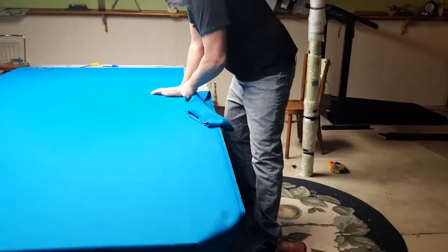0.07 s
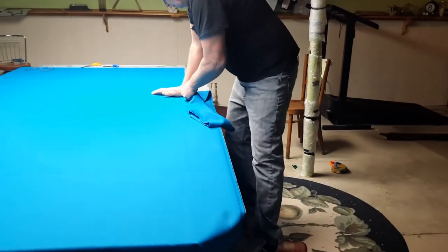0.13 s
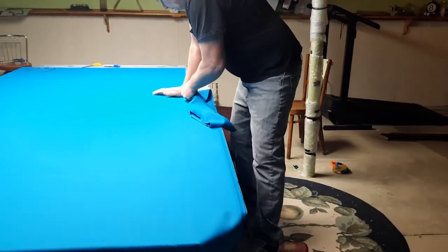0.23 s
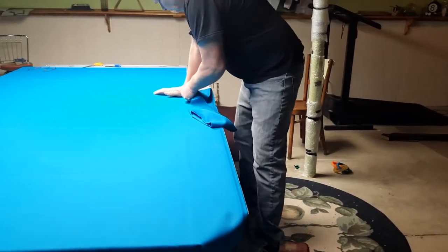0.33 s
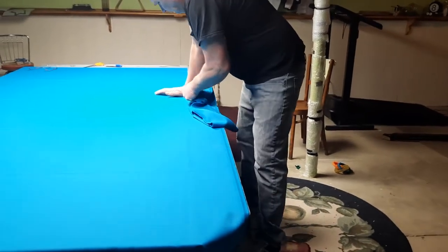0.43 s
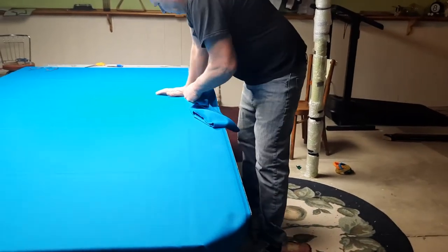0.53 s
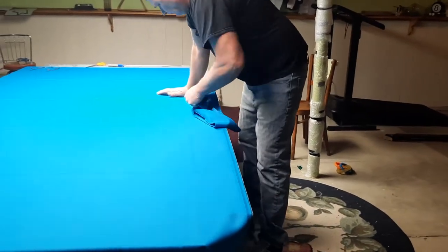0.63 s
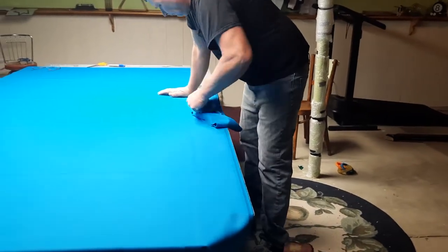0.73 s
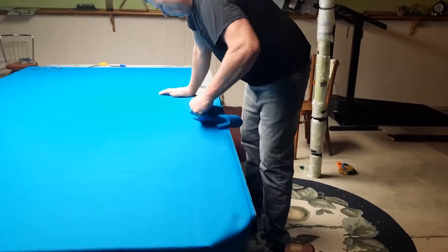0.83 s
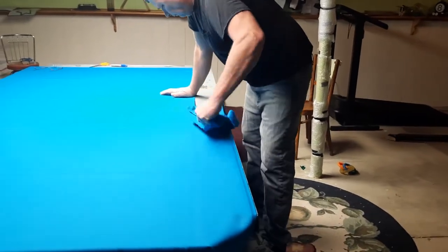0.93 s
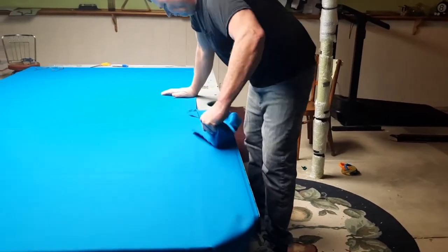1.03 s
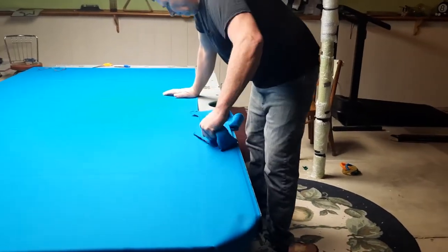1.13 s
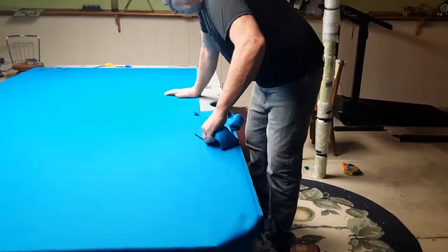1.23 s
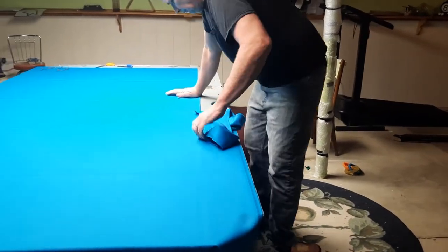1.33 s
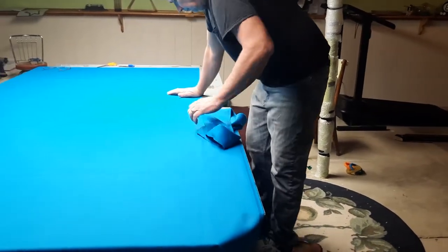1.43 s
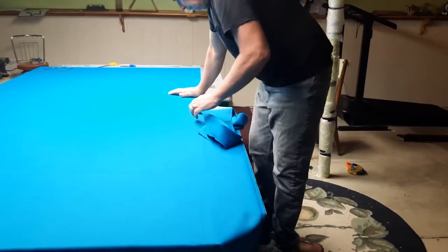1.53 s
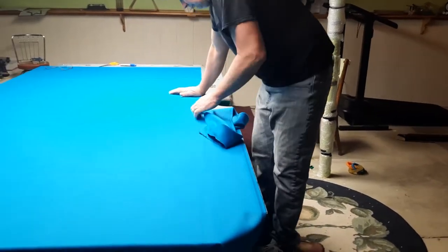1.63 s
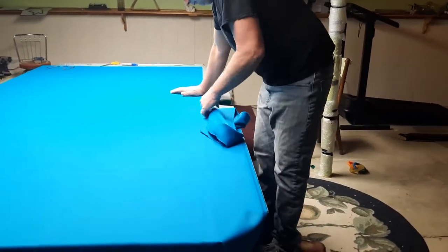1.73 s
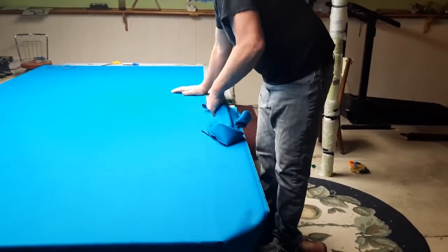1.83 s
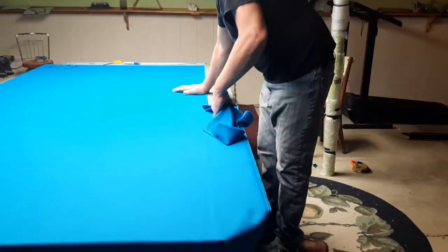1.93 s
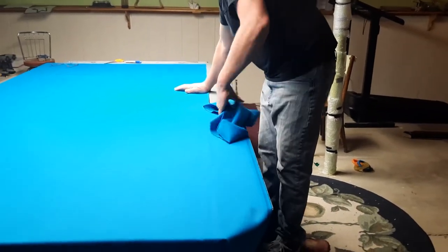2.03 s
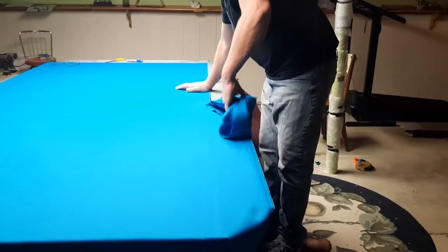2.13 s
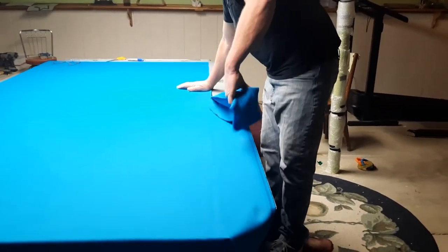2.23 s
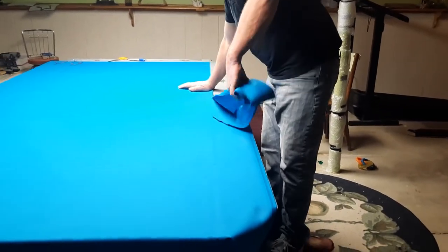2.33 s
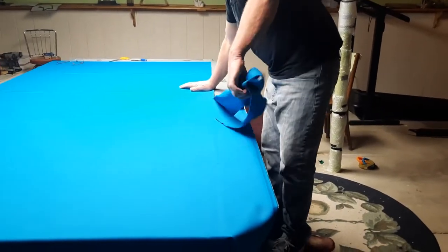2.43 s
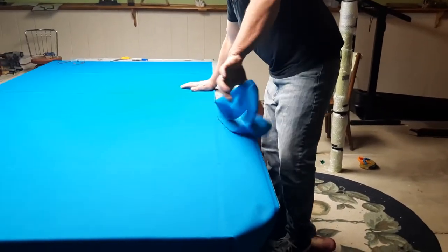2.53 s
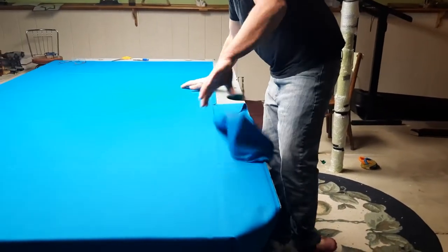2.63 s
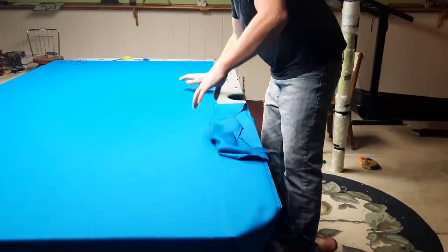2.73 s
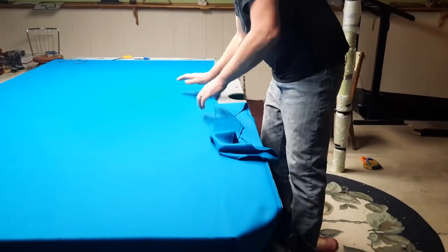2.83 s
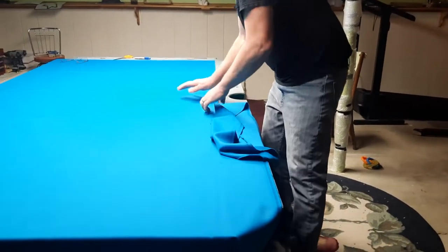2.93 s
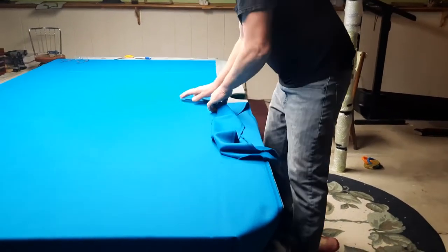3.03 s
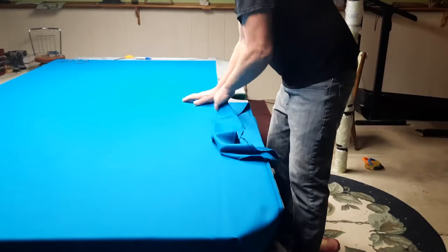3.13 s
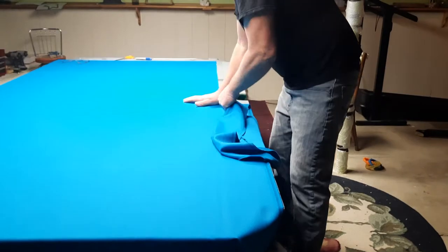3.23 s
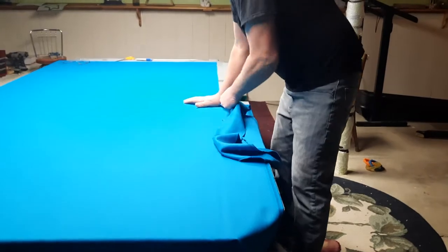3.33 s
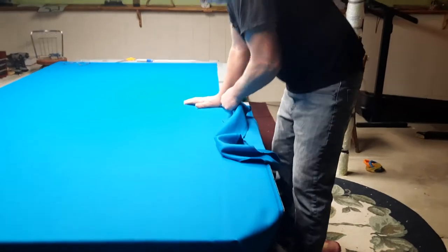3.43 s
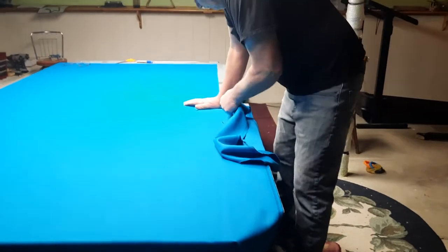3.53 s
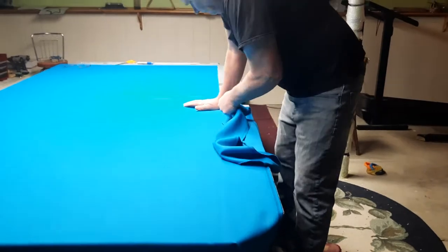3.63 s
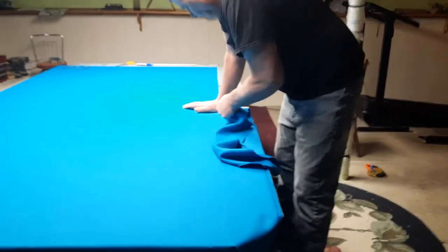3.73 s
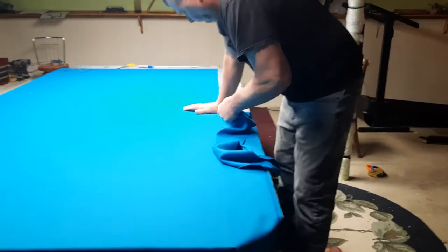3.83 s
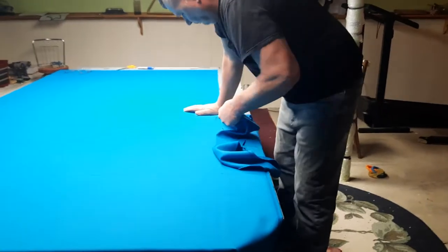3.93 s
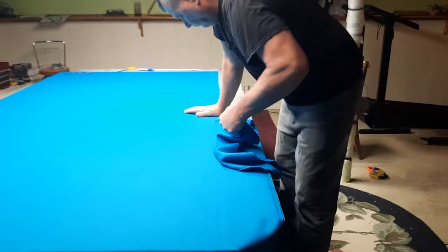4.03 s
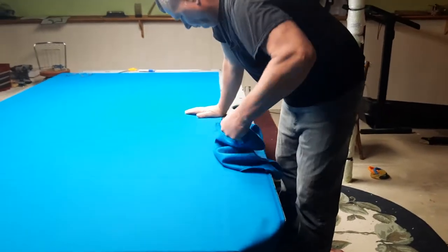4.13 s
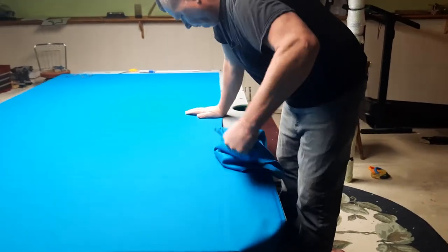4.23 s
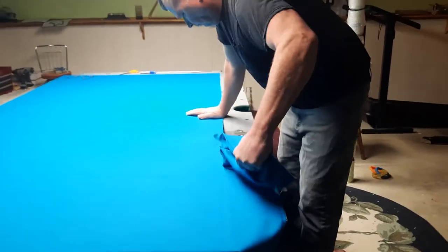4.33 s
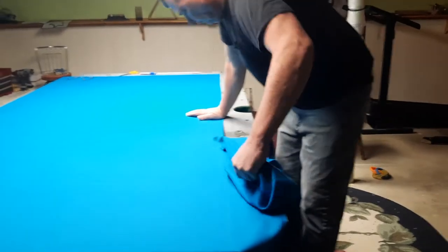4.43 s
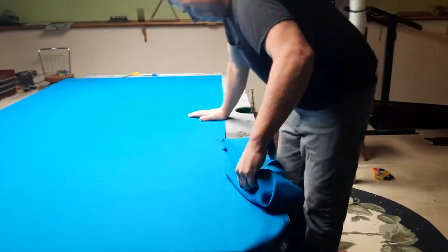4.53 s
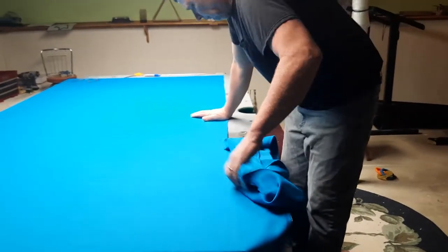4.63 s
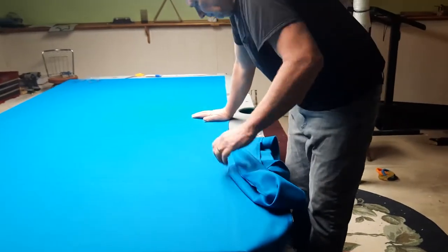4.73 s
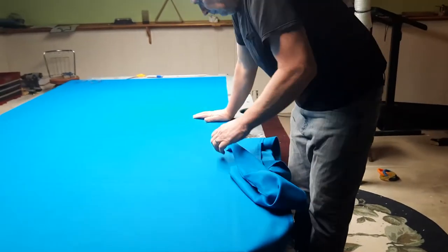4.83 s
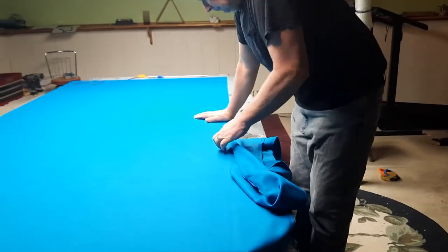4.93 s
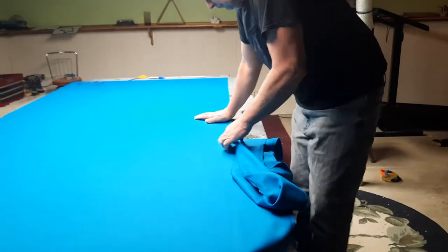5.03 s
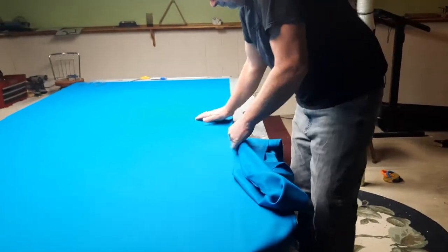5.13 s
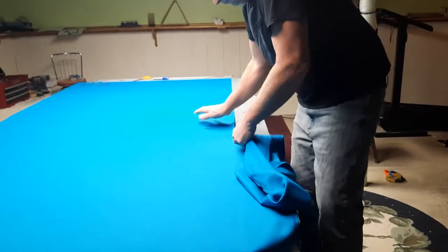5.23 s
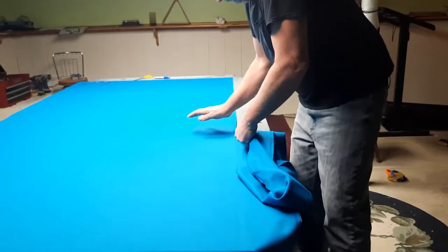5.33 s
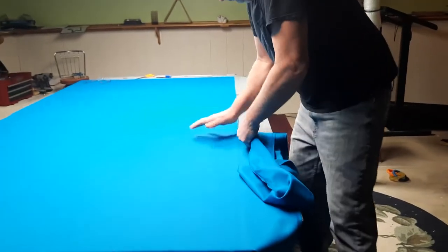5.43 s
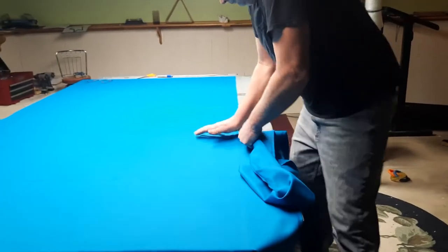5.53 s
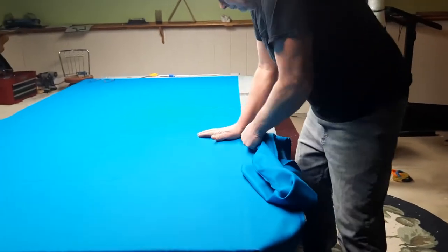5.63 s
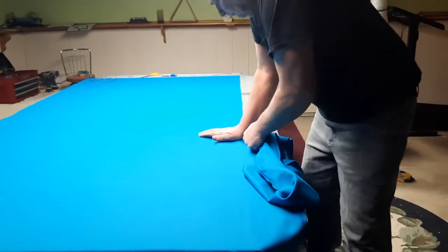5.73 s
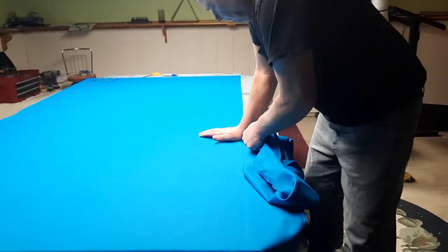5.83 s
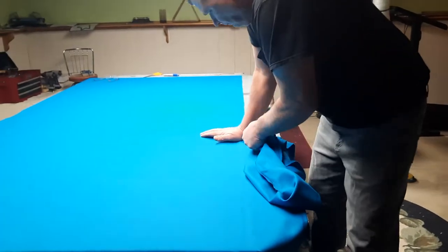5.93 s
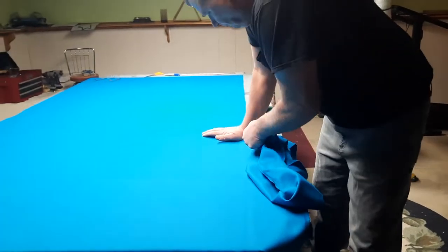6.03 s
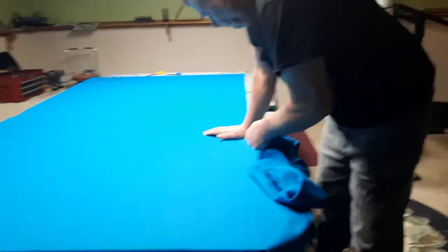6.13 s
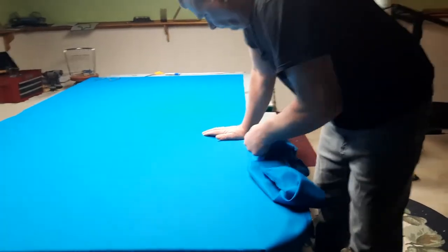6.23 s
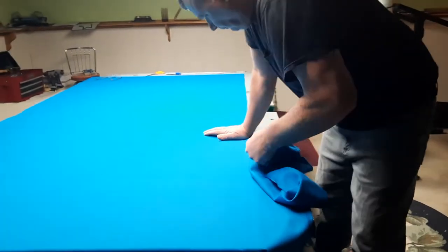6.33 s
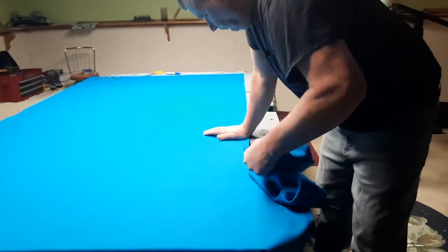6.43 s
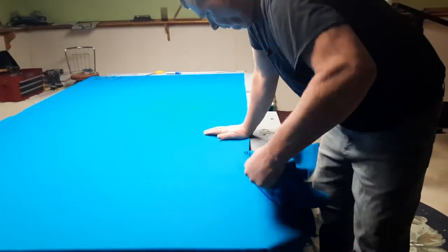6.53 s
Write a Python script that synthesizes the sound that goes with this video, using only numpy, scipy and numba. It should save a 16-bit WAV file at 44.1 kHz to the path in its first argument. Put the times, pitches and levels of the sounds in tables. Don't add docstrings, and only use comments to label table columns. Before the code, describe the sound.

Soft air, low house hum and faint cloth rustle in a basement room. At 0.3 s a loud, harsh rip bursts out: glue spots and threads snap in uneven, dense crackles until about 1.1 s, starting bright and falling to a deeper flapping tone, with table boom and fizzing fibres. A short room tail fades into calm. Rustling rises gently around 2.2-2.8 s, with dull pats near 2.6 and 3.0 s. Close finger ticks and knocks hop between sides from 3.1 s, ending in a strong thud and scrape at 3.7 s as a softer, steadier rip runs to 4.4 s. Very quiet until a sharp palm slap with a heavy follow-up at 5.6 s. Small ticks at 5.95 s, then a third rip starts crackling at 6.0 s, grows stronger with low bumps beneath, and is still tearing at the end, about 6.6 s.

```python
import sys
import numpy as np
from scipy import signal
from scipy.fft import rfft, irfft
from scipy.io import wavfile
from scipy.ndimage import uniform_filter1d
from numba import njit

SR = 44100
rng = np.random.default_rng(int(sys.argv[2]) if len(sys.argv) > 2 else 0)


def wrap_up_sound(samples):
    columns = np.atleast_2d(samples).T
    tamed = np.clip(columns, -1, 1)
    steps = np.round(tamed * 32767).astype(np.int16)
    wavfile.write(sys.argv[1], SR, steps)


def boost_factor(decibels):
    exponent = np.asarray(decibels, float) / 20
    return 10 ** exponent


N = 290178
T = np.arange(N) / SR

# time in seconds, level in dB.
PULL_CURVES = [
    [(0.303, -22), (0.335, -20), (0.351, -15), (0.415, -18), (0.6, -23), (0.759, -19), (0.96, -19),
     (1.04, -21), (1.09, -29)],
    [(3.686, -32.5), (3.752, -23), (3.79, -24.5), (3.9, -26), (3.972, -22.5), (4.138, -24), (4.266, -21.5),
     (4.342, -23), (4.37, -35)],
    [(6.025, -32), (6.08, -26.5), (6.18, -23.5), (6.307, -24.5), (6.421, -22.5), (6.521, -21.5),
     (6.555, -19.5), (6.58, -19)],
]
# start in seconds, peak in dB.
STRONG_SNAPS = [(0.303, -10), (0.325, -6.5), (0.355, -4), (0.373, -10.5), (0.388, -7), (0.4, -1),
                (0.425, -5.5), (0.436, -12), (0.484, -7), (0.515, -12), (0.573, -6.5), (0.74, -3.5),
                (0.819, -28), (3.689, -21), (3.721, -17.5), (3.782, -28), (4.068, -24), (6.03, -20.5),
                (6.047, -27), (6.061, -16.5), (6.074, -19.5), (6.091, -29), (6.1, -25), (6.11, -16),
                (6.152, -16.5), (6.184, -31)]
# boom in dB, fizz in dB, fizz held back at first in dB,
# swell in seconds, left minus right in dB.
TABLE_AND_FIBRES = [(-18.5, -21.5, -11.5, 0.17, 1), (-24, -26, -8.5, 0.14, -0.05),
                    (-19.5, -19.5, -21, 0.13, -1.4)]


def tearing():
    luck = rng.random((3, N))
    sizes = np.minimum(rng.exponential(size=(3, N)), 2.2) - 1
    signs = np.sign(rng.random((3, N)) - 0.5)
    snaps, rest, pan_db = np.zeros((3, N))
    for pull, swell in zip(PULL_CURVES, TABLE_AND_FIBRES):
        boom_db, fizz_db, late_db, swell_s, pull_pan_db = swell
        s, level_db = np.transpose(pull)
        on = (T > s[0]) & (T < s[-1])
        speed = np.clip((T - s[0]) / 0.25, 0, 1)
        snaps_per_s = (250 + 700 * speed) * boost_factor(3.0 * walk(25))

        def snapping(kind, more, spread_db):
            chance = more * snaps_per_s / SR
            return on * signs[kind] * (luck[kind] < chance) * boost_factor(spread_db * sizes[kind]) / np.sqrt(chance)

        effort_db = np.interp(T, s, level_db)
        early = np.exp(-np.maximum(T - s[0], 0) / swell_s)
        glue = snapping(0, 0.97, 3.59)
        boom = 0.5 * band(glue + snapping(1, 1.5, 2.8), 165, 600)
        boom *= boost_factor(boom_db - 21 * early)
        fizz = band(0.23 * glue + snapping(2, 8.0, 1.7), 4500, 20000)
        fizz *= boost_factor(fizz_db + late_db * early) * np.clip((s[-1] + 0.043 - T) / 0.078, 0, 1)
        snaps += boost_factor(effort_db - 8.5) * glue * (0.43 + 0.77 * speed)
        let_go = np.clip((s[-1] + 0.009 - T) / 0.03, 0, 1)
        rest += boost_factor(0.42 * (effort_db + 23)) * let_go * (T > s[0]) * (boom + fizz)
        pan_db += on * pull_pan_db
    for s, db in STRONG_SNAPS:
        add(snaps, s + 0.001222, boost_factor(db + 7.5) * np.ones(1))
    return cloth(snaps) + rest, uniform_filter1d(pan_db, 2000)


# flap from Hz, flap to Hz, line from Hz, line to Hz, line level in dB.
FLAP_AND_LINE = [(2310, 450, 2330, 2200, 0), (1100, 890, 2500, 2800, 3), (1100, 920, 5500, 2300, 4.5)]


def cloth(snaps):
    latest = np.searchsorted([pull[0][0] - 0.02 for pull in PULL_CURVES[1:]], T)
    start, end = np.transpose([(pull[0][0], pull[-1][0]) for pull in PULL_CURVES])[:, latest]
    torn = np.clip((T - start) / (end - start), 0, 1)
    from_hz, to_hz, line_from_hz, line_to_hz, line_db = np.transpose(FLAP_AND_LINE)[:, latest]
    flap_hz = to_hz + (from_hz - to_hz) * (1 - torn) ** 2.77
    line_hz = line_from_hz + (line_to_hz - line_from_hz) * torn
    flap = svf(snaps, flap_hz, np.full(N, 0.69))[1]
    flap = flap + boost_factor(-20) * svf(snaps, flap_hz, np.full(N, 0.2))[0]
    line = svf(snaps, line_hz, np.full(N, 0.13))[0]
    line = boost_factor(line_db - 5.5 * (2 - torn) - 15.5) * line
    bright = np.clip(torn / 0.3, 0, 1)
    return (1 - bright) * band(flap, 270, 3700) + bright * band(flap, 300, 4900) + line


@njit
def svf(x, hz, width):
    mid, high, b, l = np.empty(len(x)), np.empty(len(x)), 0., 0.
    for i in range(len(x)):
        g = np.tan(np.pi * hz[i] / SR)
        v = (b + g * (x[i] - l)) / (1 + g * (g + width[i]))
        mid[i] = v
        high[i] = x[i] - width[i] * v - l - g * v
        b, l = 2 * v - b, l + 2 * g * v
    return mid, high


# start in seconds, level in dB, length in seconds, top in Hz.
PALM_SLAPS = [
    (2.625, -46.5, 0.055, 295),
    (2.969, -48.5, 0.047, 298),
    (5.564, -59.5, 0.051, 600),
    (5.618, -32.5, 0.019, 2750),
    (5.636, -31.5, 0.033, 430),
    (5.656, -41.5, 0.05, 2700),
]


def slaps():
    out = np.zeros(N)
    t = np.arange(SR // 5) / SR
    for s, db, length_s, top_hz in PALM_SLAPS:
        burst = rng.standard_normal((2, len(t))) * np.exp(-(t / length_s) ** 2)
        skin = band(burst[0], 346, max(top_hz, 550), order=4)
        skin = skin + band(burst[0], 0.92 * top_hz, top_hz)
        thump_db = 11.0 if top_hz < 1000 else 6.0
        thump = boost_factor(thump_db) * band(burst[1], 42, min(top_hz, 500))
        add(out, s, boost_factor(db) * (skin + thump))
    return out


# start in seconds, peak in dB, ring in Hz, T60 in seconds,
# left minus right in dB.
CASE_KNOCKS = [(3.133, -19, 303, 0.049, -25), (3.302, -31, 148, 0.077, -7), (3.607, -15, 247, 0.018, 18),
               (3.643, -25.5, 325, 0.081, 24), (3.708, -10, 235, 0.041, 20), (5.632, -35, 131, 0.059, 3),
               (6.22, -39, 90, .1, 16), (6.36, -35, 90, 0.072, 17)]
# start in seconds, peak in dB, T60 in seconds, left minus right in dB,
# top in Hz.
CASE_TICKS = [(3.09, -62, 0.33, -19, 12000), (3.132, -42, 0.031, -29, 4940), (3.19, -51, .01, -11, 7000),
              (3.204, -51, 0.0086, -7, 7000), (3.262, -51, .02, -18, 9000),
              (3.279, -30.5, 0.0067, -27, 7560), (3.297, -18.5, 0.01, -19, 4200),
              (3.301, -28, 0.01, -25, 6000), (3.443, -41, 0.041, -18, 5800),
              (3.456, -28, 0.0067, -16, 3900), (3.489, -49, 0.036, -27, 5960),
              (3.606, -30.5, 0.18, -9, 4900), (3.642, -30.5, 0.074, 28, 3000),
              (3.674, -24, 0.0027, 19, 8000), (3.701, -18, 0.07, 13, 4000), (5.948, -31.5, 0.02, 5, 4850),
              (5.96, -50, 0.29, 1, 12000)]
# level in dB, T60 in seconds, from Hz, to Hz.
SKIN_SQUEAK = (-42, 0.06, 3950, 4550)
# start in seconds,
# level in dB, T60 in seconds, low edge in Hz, left minus right in dB.
SCRAPES_AND_FIZZ = [(3.636, -41, 0.06, 3200, 20), (3.687, -11, 0.034, 2350, -1), (3.702, -3, 0.026, 2290, 7.5),
                    (3.1, -61, .2, 11000, -17), (3.583, -52, .02, 7300, -7), (6.028, -41, 0.55, 11000, 8),
                    (5.619, -33, .16, 2560, 2.5), (5.59, -59, 0.42, 4450, -15), (5.62, -61, 0.22, 8100, 9),
                    (5.687, -58.5, 0.32, 9000, 9), (5.621, -37, 0.075, 4600, -12.5),
                    (5.685, -50, 0.39, 4800, -9)]


def fingers():
    out = np.zeros((2, N))
    t = np.arange(SR // 8) / SR
    sides = np.array([[0.5], [-0.5]])
    for s, db, hz, t60, pan_db in CASE_KNOCKS:
        ring = -np.sin(2 * np.pi * hz * t / (1 + 35 * t))
        ring = ring + 3.4 * band(rng.standard_normal(len(t)), 66, 500)
        sway = boost_factor(4.0 - 60 * t / 0.19) * band(rng.standard_normal((2, len(t))), 42, 95)
        fade = boost_factor(-50 * t / t60) * np.clip(t / 0.0016, 0, 1)
        add(out, s, boost_factor(db + 2.0 + sides * pan_db - abs(pan_db) / 2) * (ring * fade + sway))
    for s, db, t60, pan_db, top_hz in CASE_TICKS:
        grit = rng.standard_normal((2, len(t))) * boost_factor(-60 * t / t60)
        tick = band(grit, 480, top_hz) + 0.21 * band(grit, 11000, 16000)
        add(out, s, boost_factor(db - 7.0 + sides * pan_db) * tick)
    db, t60, from_hz, to_hz = SKIN_SQUEAK
    slip_hz = to_hz + (from_hz - to_hz) * np.exp(-t / 0.037)
    slip = svf(rng.standard_normal(len(t)), slip_hz, np.full(len(t), 0.06))[0]
    add(out, 3.64, boost_factor(db - 60 * t / t60 + sides * 19) * np.clip(t / 0.006, 0, 1) * unit(slip))
    for s, db, t60, low_hz, pan_db in SCRAPES_AND_FIZZ:
        grit = rng.standard_normal((2, len(t))) * boost_factor(-60 * t / t60) * np.clip(t / 0.0022, 0, 1)
        high_hz = low_hz * (1 + low_hz / 12400)
        add(out, s, boost_factor(db + 1.0 + sides * pan_db) * band(grit, low_hz, high_hz))
    return out


# time in seconds, level in dB.
CALM_LEVEL = [(0, -59.5), (.29, -59), (1.4, -66), (1.61, -67), (1.9, -66), (2.24, -58), (2.64, -55),
              (2.81, -58.5), (2.98, -62), (3.24, -59.5), (3.58, -60.5), (4.65, -70.5), (4.9, -71.5),
              (5.04, -67), (5.24, -66.5), (5.4, -70), (5.9, -71), (6.02, -65)]
# house hum in dB, crisp edge in dB.
GRIP_CALM = [(-49.5, -72.5), (-57.5, -64.5), (-50.5, -76)]
REGRIPS_S = [3.64, 5.9]


def calm():
    air_db = np.interp(T, *np.transpose(CALM_LEVEL))
    lift_db = air_db + 60
    hum_db, crisp_db = np.transpose(GRIP_CALM)[:, np.searchsorted(REGRIPS_S, T)]
    ducked, pulling = np.zeros((2, N))
    for pull in PULL_CURVES:
        start, end = pull[0][0], pull[-1][0]
        ducked += (T > start) * np.clip(1 - (T - end) / 2.6, 0, 1)
        pulling += (T > start) * (T < end)
    hum_sway_db = 0.41 * lift_db - 7.5 * ducked
    edge_db = crisp_db + 2.1 * lift_db + 3.0
    crisp_db = crisp_db + 2.4 * lift_db
    rumble = boost_factor(hum_db + hum_sway_db + 0.81 * walk(36) + 11.5) * pair(220, 403.5)
    air = boost_factor(air_db + 0.43 * walk(12) + 0.5) * pair(430, 3200)
    edge = boost_factor(edge_db - crisp_db) * (pair(4200, 4800) + 1.1 * pair(5500, 6400))
    crisp = boost_factor(crisp_db + walk(27) + 6.5) * (pair(5000, 20000) + edge)
    shake_db = 8 * uniform_filter1d(pulling, size=4000)
    deep = band(rng.standard_normal((2, N)), 36, 190, order=3) + 2.0 * pair(70, 200)
    deep = boost_factor(0.62 * hum_sway_db - 49.5 + shake_db + walk(2.3)) * deep
    return rumble + air + crisp, deep


def pair(low_hz, high_hz, size=N):
    mid, side = rng.standard_normal((2, size))
    side = signal.sosfilt(signal.butter(2, 700, "highpass", fs=SR, output="sos"), side)
    return band(np.array([mid + side, mid - side]), low_hz, high_hz)


SCATTER_HZ = 3000
# frequency in Hz, T60 in seconds.
ROOM_DECAY = [(60, 0.75), (300, 0.51), (1500, 0.43), (5000, 0.33), (12000, 0.23)]


def room(x):
    t, tail = np.arange(SR // 2) / SR, 0
    decay_hz, decay_s = np.transpose(ROOM_DECAY)
    for hz in 45 * 2.0 ** np.arange(9):
        t60 = np.interp(np.log(hz), np.log(decay_hz), decay_s)
        octave = pair(hz / 2 ** 0.5, hz * 2 ** 0.5, size=len(t))
        tail = tail + octave * np.sqrt(1 / t60) * boost_factor(-60 * t / t60)
    tail = tail * np.clip(t / 0.012, 0, 1)
    tail = boost_factor(-3) * unit(tail) / np.sqrt(len(t))
    glints = rng.standard_normal(tail.shape) * boost_factor(-60 * t / 0.0012)
    tail += band(glints / np.sqrt(np.sum(glints ** 2) / 2), SCATTER_HZ, 20000)
    return signal.fftconvolve(x[None], tail, axes=1)[:, :N]


def moving(x):
    turn = 2 * np.pi * 1.3 * T
    return band(x, 24, SCATTER_HZ) + room(x * np.cos(turn)) + room(x * np.sin(turn))


# frequency in Hz, level in dB.
GRIP_COLOURS = [
    ([(317, -16.5), (1710, -7), (2180, 1), (3350, -18), (3760, -8), (4300, -34.5), (5180, -37.5), (15700, -35)], [(317, -14.5), (653, -16.5), (872, -13), (1350, -18.5), (2700, -15.5), (4490, -16.5), (10200, -38.5), (15700, -30.5)]),
    ([(317, 1), (637, -5), (1010, -3.5), (1590, -13), (2290, -5.5), (2700, -12.5), (4070, -15.5), (15700, -21.5)], [(317, 2.5), (579, -8), (2640, -3), (4280, -11), (6140, -9), (7260, -17.5), (9930, -21), (15700, -16)]),
    ([(317, 1.5), (501, -7.5), (1160, -5), (1650, -9), (2770, 0.5), (4600, -7), (7000, -21.5), (15700, -20.5)], [(317, -1), (501, -13), (1220, -7.5), (1480, -15), (2640, -4), (5990, -15), (8000, -28.5), (15700, -27.5)]),
]
# frequency in Hz, level in dB.
BASS_SLOPE = [(130, -4), (215, -14)]


def ports(x):
    out, edges = 0, [-1, *REGRIPS_S, 9]
    for k, grip in enumerate(GRIP_COLOURS):
        ring = []
        for side in grip:
            bass = [(hz, db + side[0][1]) for hz, db in BASS_SLOPE]
            ring.append(response(bass + list(side)))
        ring = np.array(ring)
        ring = ring / np.sqrt(np.sum(band(ring, 650, 5000) ** 2) / 4)
        held = np.clip((T - edges[k]) / 0.05 + 0.5, 0, 1) * np.clip((edges[k + 1] - T) / 0.05 + 0.5, 0, 1)
        out = out + held * signal.oaconvolve(x, ring, axes=1)[:, :N]
    return out


def response(table, size=2048):
    hz, db = np.transpose(table)
    log_hz = np.log(np.fft.rfftfreq(size, 1 / SR) + 1)
    cepstrum = irfft(np.interp(log_hz, np.log(hz), db) * np.log(10) / 20)
    cepstrum[1:size // 2] *= 2
    cepstrum[size // 2 + 1:] = 0
    return irfft(np.exp(rfft(cepstrum)))


def unit(x):
    return x / np.sqrt(np.mean(x ** 2))


def band(x, low_hz, high_hz, order=2):
    edges_hz = [low_hz, min(high_hz, 0.45 * SR)]
    return signal.sosfilt(signal.butter(order, edges_hz, "bandpass", fs=SR, output="sos"), x)


def walk(rate):
    k = int(SR / rate)
    held = np.repeat(rng.standard_normal(N // k + 1), k)
    return 1.3 * uniform_filter1d(uniform_filter1d(held, k), k)[:N]


def add(out, at_s, sound):
    i = int(at_s * SR)
    out[..., i:i + sound.shape[-1]] += sound[..., :N - i]


def scene():
    tear, pan_db = tearing()
    heard = moving(tear + slaps()) * boost_factor(np.array([pan_db, -pan_db]) / 2)
    air, deep = calm()
    return band(ports(heard + air), 150, 19000) + deep + fingers()


def low_pass(x):
    return signal.sosfilt(signal.butter(12, 16870, fs=SR, output="sos"), x)


def record(dry):
    hiss = boost_factor(-87.5) * rng.standard_normal(dry.shape)
    mix = np.tanh(dry + hiss)
    mix = signal.sosfilt(signal.ellip(8, 0.2, 60, 15900, fs=SR, output="sos"), mix)
    return low_pass(mix)


dry = scene()
out = record(dry)
wrap_up_sound(out)
```